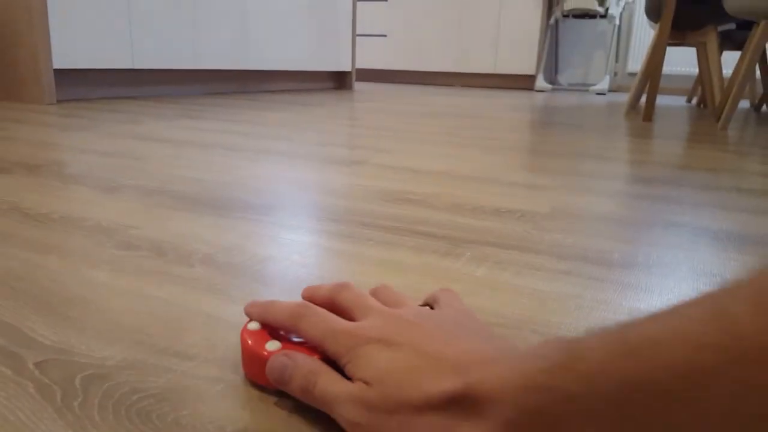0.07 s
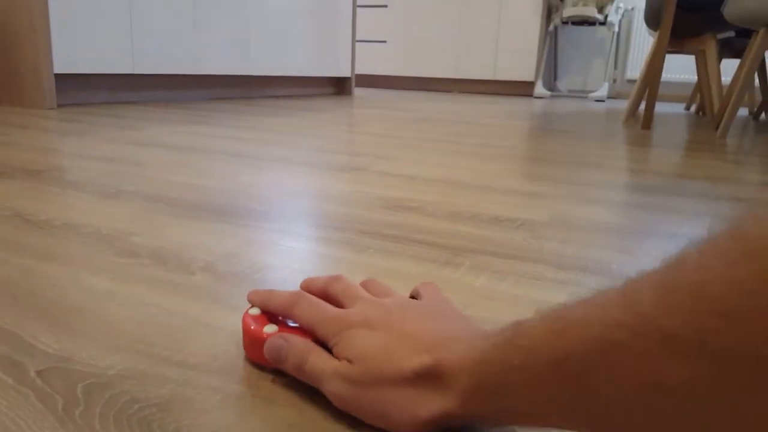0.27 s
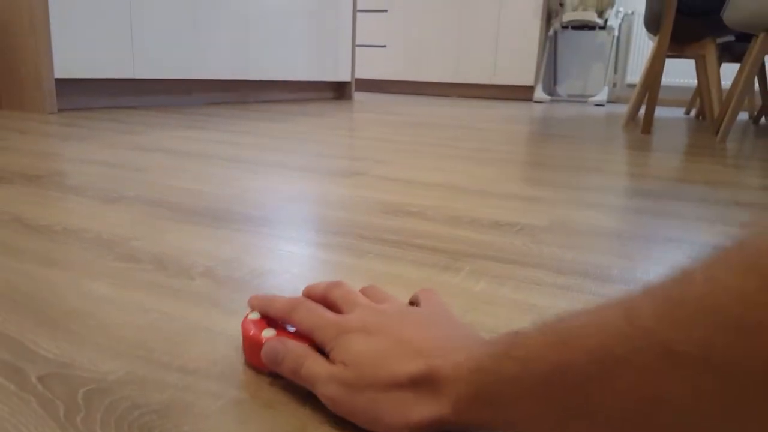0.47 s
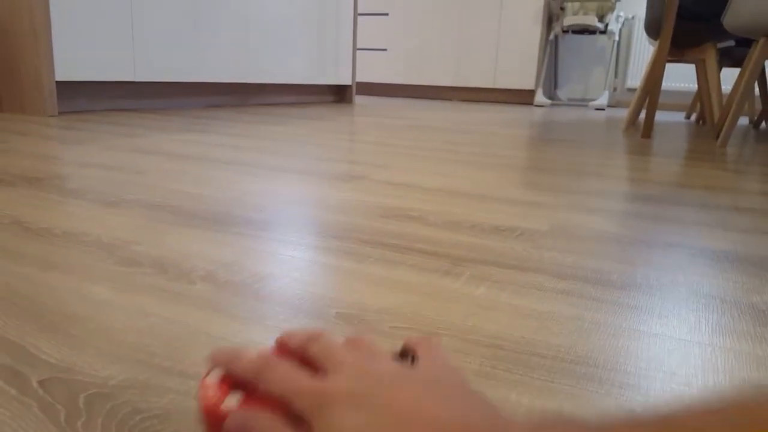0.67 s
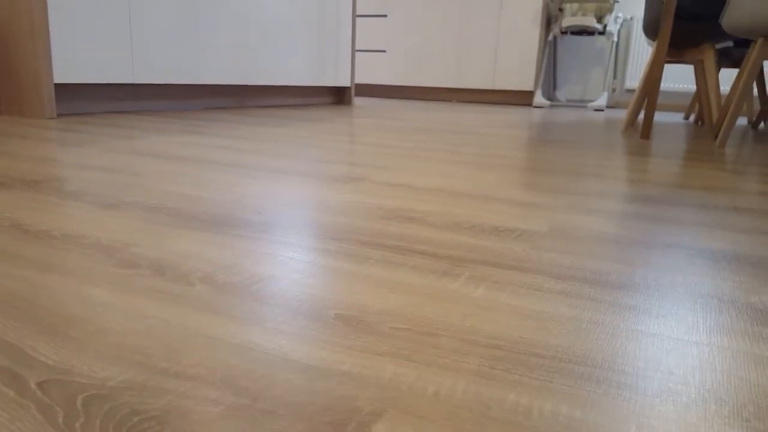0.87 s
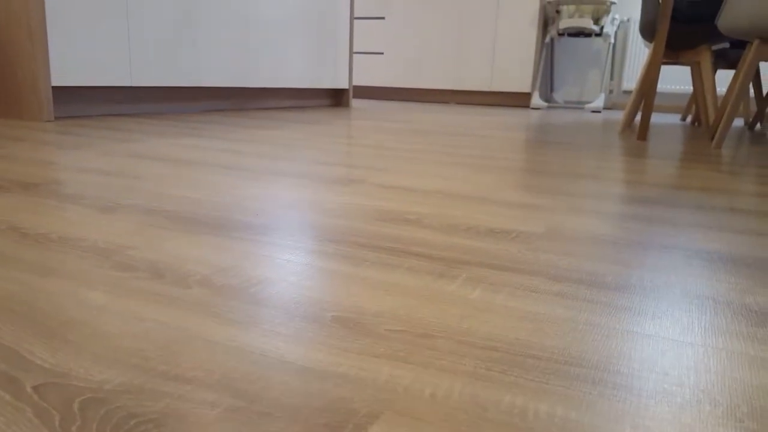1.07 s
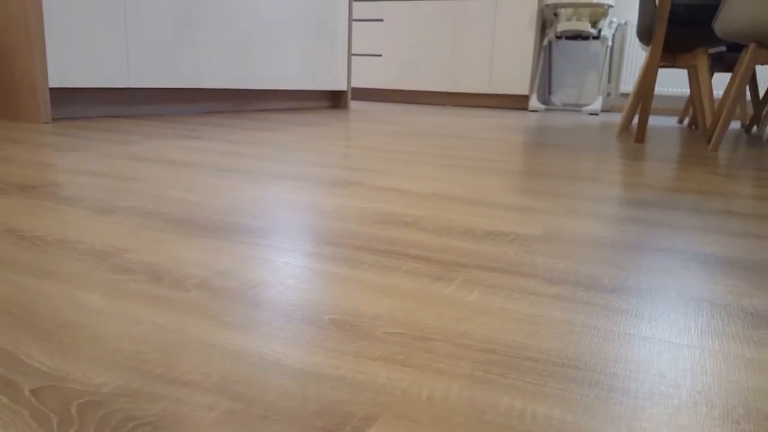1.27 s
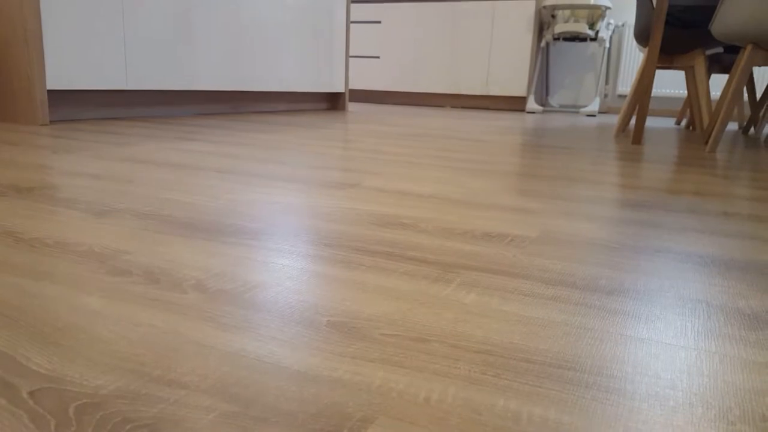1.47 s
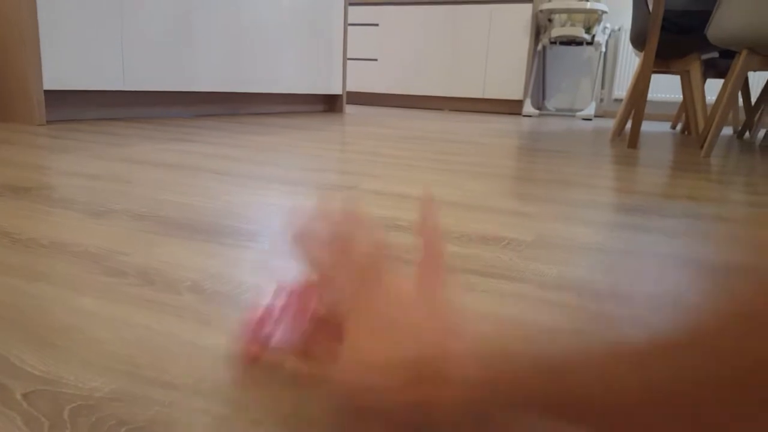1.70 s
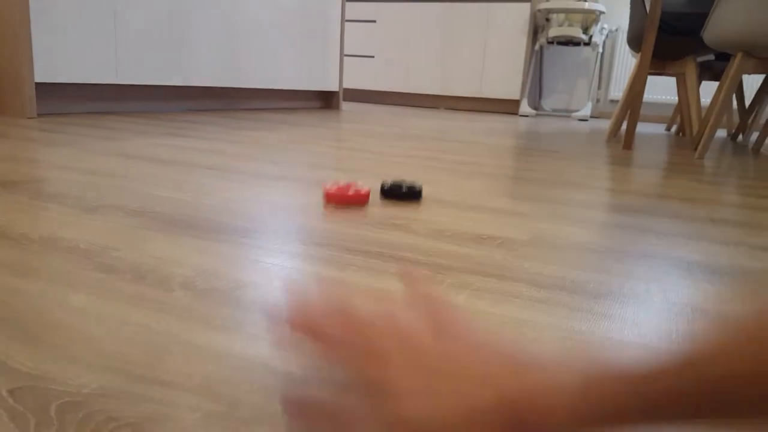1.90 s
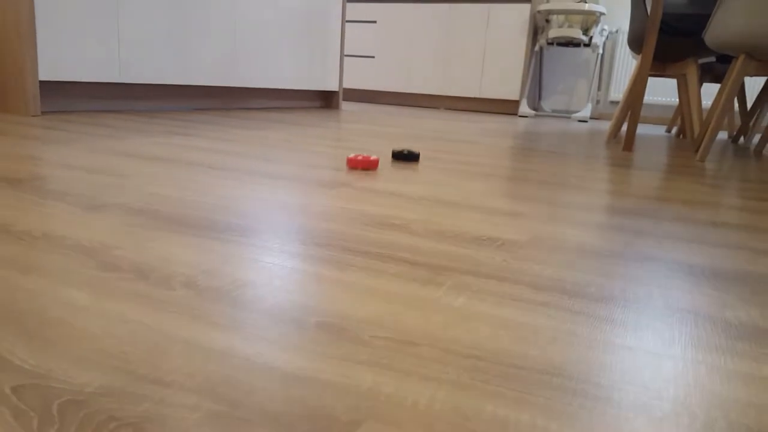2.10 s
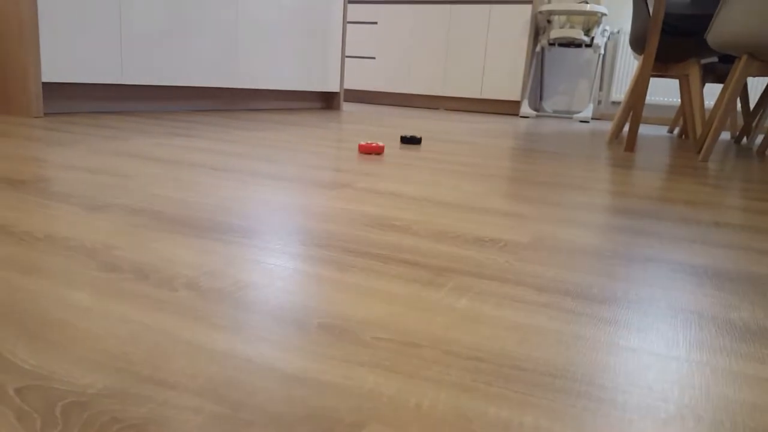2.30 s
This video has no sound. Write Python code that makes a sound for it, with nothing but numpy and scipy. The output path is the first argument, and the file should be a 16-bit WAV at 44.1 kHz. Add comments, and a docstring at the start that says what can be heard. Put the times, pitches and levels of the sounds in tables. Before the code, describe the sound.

Plastic pucks rasp as a hand drags and shoves them, then slide off hissing.

```python
"""Two plastic pucks on a laminate floor, heard from close by in a kitchen.
First a hand shifts them about. From 0.5 s it drags them back, and just after 1.5 s it shoves them off.
All this time they are pressed down, so they rasp, catch and drum on the humming boards.
Near 1.8 s the hand lets go: they wobble, chatter and glide away with a thin, ringing hiss.
As they go, a few soft thuds come through the floor."""
import sys
import numpy as np
from scipy import signal
from scipy.fft import rfft, irfft, next_fast_len
from scipy.io import wavfile
from scipy.ndimage import uniform_filter1d

SR = 44100
rng = np.random.default_rng(int(sys.argv[2]) if len(sys.argv) > 2 else 0)


def log_audio(samples):
    """Write samples as a 16-bit WAV file to the path given in sys.argv[1]."""
    # one column per channel
    frames = np.atleast_2d(samples).T
    # limit to full scale, then quantise
    limited = np.clip(frames, -1, 1)
    pcm = np.round(limited * 32767).astype(np.int16)
    wavfile.write(sys.argv[1], SR, pcm)


N = 108045
T = np.arange(N) / SR


# The three moves of the hand. Each row: time in seconds, drumming level in dB, grit level in dB.
SHIFT_LEVELS = [(0, -51, -78), (.045, -50.5, -76), (.1, -45.5, -63.5), (.21, -45, -64), (.245, -49, -69),
                (.34, -46, -62), (.358, -47.5, -68), (.396, -45.5, -63), (.408, -50, -62.5),
                (.47, -62, -84)]
DRAG_LEVELS = [(.5, -64, -99), (.555, -52, -70), (0.569, -45.5, -62.5), (.63, -39.5, -54.5),
               (.71, -35, -53), (.82, -33.5, -54.5), (.92, -32.5, -49), (1.05, -33.5, -52),
               (1.14, -34, -53), (1.28, -34.5, -55), (1.39, -35, -50), (1.467, -37, -53.5),
               (1.5, -46.5, -58.5), (1.531, -58, -82)]
SHOVE_LEVELS = [(1.547, -46, -72), (1.555, -41.5, -53), (1.592, -33.5, -47), (1.635, -30, -51),
                (1.71, -31.5, -45.5), (1.75, -33, -50.5), (1.79, -41, -49), (1.83, -54, -66),
                (1.9, -72, -77)]
# Bumps come thick and even at speed, sparse and clumped when slow.
# Each row: time in seconds, bumps per second, clumping in dB.
FLOOR_GRAIN = [(0, 1600, 3), (.9, 2800, 0.5), (1.15, 1400, 2), (1.45, 1240, 3), (1.64, 5030, -0.5)]
# The pressed pucks' hollow low note, and a higher one that sings out and rises in the shove.
# Each row: time in seconds, pitch in Hz, strength next to the boards in dB.
LOW_NOTE = [(.5, 644, -21), (.66, 640, -5), (.78, 880, -4.5), (.86, 739, -0.5), (.94, 671, 2),
            (1.09, 690, -0.5), (1.2, 690, 0), (1.58, 682, -0.5), (1.66, 625, -8.5)]
HIGH_NOTE = [(0, 1400, -2.5), (.72, 1425, -2), (.93, 1406, -3.5), (1.14, 1380, -1), (1.44, 1270, -4),
             (1.57, 1070, -8), (1.61, 1126, -2), (1.645, 1409, 6), (1.78, 1437, 4.5)]
# A note of steady pitch, and the bass in the drumming. Each row: time in seconds, strength in dB.
STEADY_NOTE = [(0, -10), (.4, -3), (.62, -4), (.8, -9.5), (.97, -7), (1.1, -16), (1.3, -19), (1.41, -8),
               (1.5, -9), (1.6, -8), (1.65, -9), (1.72, -2), (1.8, -1)]
BASS_LEVELS = [(0, -6), (.45, -7), (.7, -14.5), (1.0, -14), (1.3, -11.5), (1.55, -6.5), (1.61, -10.5),
               (1.67, -23.5), (1.9, -20)]
# The tone of the boards, their bass and the grit. Each row: frequency in Hz, strength in dB.
BOARD_TONE = [(30, -78), (200, -32), (400, -13.5), (530, -3.5), (660, -2.5), (900, 1.5), (1100, -2),
              (1480, -5), (1800, -5), (2100, -8), (2350, -18), (3000, -35), (6000, -68.5)]
BASS_TONE = [(25, -40), (60, -40.5), (100, -21), (145, -14.5), (200, -18), (300, 0.5), (420, 7), (600, -9),
             (1200, -45)]
GRIT_TONE = [(300, -18), (1500, 3.5), (2600, 5), (3050, -2.5), (3700, -3.5), (4700, 2), (5600, 0),
             (6600, -5), (7700, -3), (9500, -7.5), (11700, -10.5), (13000, -35), (14500, -59)]
def rasp():
    """Pressed pucks bump over the floor's grain: the boards drum, three notes swell, grit crackles."""
    drum_db, grit_db = follow(SHIFT_LEVELS + DRAG_LEVELS + SHOVE_LEVELS)
    bass_db, = follow(BASS_LEVELS)
    rate, clump_db = follow(FLOOR_GRAIN)
    low_hz, low_db = follow(LOW_NOTE)
    high_hz, high_db = follow(HIGH_NOTE)
    steady_db, = follow(STEADY_NOTE)
    grain = bumps(per_s=rate, spread_db=2, clump_db=clump_db, clump_hz=170, scatter=0.14)
    drum, power = unit(colour(grain, BOARD_TONE)), 1
    for hz, db, width_hz in [(low_hz, low_db, 311), (high_hz, high_db, 330), (2040, steady_db, 250)]:
        push = colour(grain * rng.choice([-1., 1.], N), BOARD_TONE)
        drum += amp(db) * resonate_twice(push, hz, width_hz)
        power += amp(db) ** 2
    drum = drum / np.sqrt(power) + amp(bass_db) * colour(grain, BASS_TONE)
    grit = colour(unit(specks() + 0.51 * grain), GRIT_TONE)
    return amp(drum_db) * drum + amp(grit_db) * grit


# Two sizes of grit. Each row: lowest and highest frequency of its crackle in Hz.
SPECK_BANDS = [(200, 4800), (4800, 15000)]
def specks():
    """Coarse and fine specks are crushed, each in their own bursts."""
    crackle = 0
    for band in SPECK_BANDS:
        bursts = bumps(per_s=4000, spread_db=4, clump_db=4, clump_hz=103, scatter=0.89)
        crackle += signal.sosfilt(signal.butter(2, band, "band", fs=SR, output="sos"), bursts)
    return crackle


HIT_GAIN = np.sqrt(0.0032 * SR)  # gives a hit the energy of 3.2 ms of sound at its level
# The tone of plastic ticking on the floor. Each row: frequency in Hz, strength in dB.
TICK_TONE = [(600, -25), (2800, -8.5), (4000, -2), (4800, 2.5), (6300, -2.5), (7800, -2), (10000, -13.5),
             (12000, -32), (14000, -47)]
# Pucks catching on the floor. Each row: start in seconds, knock level in dB, tick level in dB.
EDGE_CATCHES = [(0.022, -60, -49.5), (0.047, -47.5, -49), (0.0504, -38.5, -68), (0.0612, -48, -52),
                (.093, -42.5, -61.5), (0.0998, -40, -55), (.127, -41.5, -50), (.147, -39.5, -62.5),
                (0.15, -43, -50), (0.1846, -43.5, -51), (0.192, -39, -50), (.207, -39, -52),
                (0.219, -58.5, -45.5), (.295, -50, -50), (0.312, -37.5, -47), (.367, -40, -50.5),
                (0.376, -46, -50), (.393, -47, -49), (0.445, -54.5, -51.5), (.519, -64, -67),
                (0.563, -41, -54), (0.61, -45, -48), (0.937, -44, -42), (1.143, -29, -45.5),
                (1.195, -36, -51), (1.447, -34.5, -48), (1.552, -37, -49.5), (1.572, -40, -51),
                (1.743, -41, -58)]
def catches(decay_s=0.00171, judder_share=0.14):
    """A puck's edge catches: a knock in the boards, a brief judder and a scratchy tick."""
    knock, tick = np.zeros((2, N))
    for start, knock_db, tick_db in EDGE_CATCHES:
        add(knock, start, amp(knock_db) * np.sqrt(judder_share) * scuff(decay_s))
        add(knock, start, amp([knock_db]) * np.sqrt(1 - judder_share))
        add(tick, start, amp(tick_db) * scuff(decay_s))
    boards = colour(knock, BOARD_TONE) + 0.32 * colour(knock, BASS_TONE)
    return HIT_GAIN * (boards + colour(tick, TICK_TONE))


# The free slide. Each row: time in seconds, hiss level in dB, ring level in dB, ring pitch in Hz.
FREE_GLIDE = [(1.75, -69.5, -93, 4800), (1.8, -46, -64, 4770), (1.85, -48.5, -53, 4840),
              (1.92, -49, -51, 4720), (2.0, -47.5, -54.5, 4800), (2.15, -49.5, -56.5, 4650),
              (2.3, -50.5, -52.5, 4160), (2.45, -48.5, -55, 4100)]
# The tone of the hiss. Each row: frequency in Hz, strength in dB.
HISS_TONE = [(30, -39), (70, -47), (140, -21), (260, -14), (430, -2.5), (680, 2), (1000, -1.5),
             (1500, -9.5), (1800, -2.5), (2020, 2), (2300, -11.5), (3000, -12.5), (3800, -2.5), (5600, -11),
             (7500, -12.5), (11800, -25), (13000, -41), (14500, -59)]
def glide():
    """Free pucks hiss over the floor; as they slow, the pitch sinks onto the shells' own notes."""
    hiss_db, ring_db, ring_hz = follow(FREE_GLIDE)
    fine = bumps(per_s=6000, spread_db=2, clump_db=0.5, clump_hz=120, scatter=0.418)
    rough = bumps(per_s=4300, spread_db=5.5, clump_db=4.5, clump_hz=110, scatter=0.74)
    skim = resonate_twice(rough, ring_hz, width_hz=926)
    return amp(hiss_db) * colour(fine, HISS_TONE) + amp(ring_db) * (skim + shell_ring(skim))


# The shells' own notes, the main one last. Each row: pitch in Hz, width in Hz, strength in dB.
SHELL_NOTES = [(3780, 170, -0.5), (4750, 170, -8.5), (4277, 110, -0.5)]
def shell_ring(push):
    """A shaken plastic shell rings at its own notes."""
    return sum(amp(db) * resonate(push, hz, width_hz) for hz, width_hz, db in SHELL_NOTES)


# How loudly the shells chatter. Each row: time in seconds, level in dB.
CHATTER_LEVELS = [(0, -61), (.08, -53.5), (.2, -54.5), (.26, -57.5), (.39, -60), (.47, -99), (.53, -63),
                  (.62, -48), (.71, -45.5), (.8, -52.5), (.9, -52.5), (1.74, -70), (1.795, -46.5),
                  (1.85, -47.5), (1.92, -51), (2.0, -54), (2.2, -62), (2.45, -61)]
# The tone of the chatter. Each row: frequency in Hz, strength in dB.
CHATTER_TONE = [(100, -24), (500, -21), (1200, 8.5), (1750, 4), (2050, 5), (2350, 3.5), (3000, 1.5),
                (3900, 4.5), (4350, 2.5), (5000, -2), (6300, -7.5), (7800, -2.5), (10000, -14),
                (12000, -43), (14000, -61)]
def chatter(ring_db=-8.5):
    """The plastic shells chatter and ring thinly when little weight is on them."""
    level_db, = follow(CHATTER_LEVELS)
    taps = bumps(per_s=5000, spread_db=5.5, clump_db=6, clump_hz=131, scatter=0.69)
    return amp(level_db) * (colour(taps, CHATTER_TONE) + amp(ring_db) * unit(shell_ring(taps)))


# Released pucks touching down. Each row: start in seconds, tick level in dB, ping level in dB.
TOUCHDOWNS = [(1.794, -44, -55), (1.82, -48.5, -59.5), (1.832, -45, -55.5), (1.848, -41.5, -54),
              (1.864, -46, -59), (1.876, -45, -56), (1.904, -47, -42), (1.917, -47, -39.5),
              (1.956, -51.5, -45.5)]
def wobbles():
    """Each touch of a wobbling puck is a light tick and a ping of the shell's main note."""
    tick, strikes = np.zeros((2, N))
    hz, width_hz, _ = SHELL_NOTES[-1]
    for start, tick_db, ping_db in TOUCHDOWNS:
        add(tick, start, amp(tick_db) * scuff(decay_s=0.003))
        add(strikes, start, amp([ping_db]))
    ping = resonate(strikes, hz, width_hz) * np.sqrt(SR / (np.pi * width_hz))
    return HIT_GAIN * (colour(tick, TICK_TONE) + ping)


# Thuds in the floor. Each row: start in seconds, level in dB, pitch in Hz, length in seconds.
FLOOR_THUDS = [(1.9, -48.5, 197, 0.019), (2.103, -53.5, 89, 0.0278), (2.5, -62, 130, 0.044),
               (2.15, -58, 174.7, 0.034), (2.15, -70, 74, 0.05)]
def thuds():
    """Each thud is a few soft, low swings of the floor."""
    mix = np.zeros(N)
    for start, db, hz, length in FLOOR_THUDS:
        swell = np.sin(np.pi * np.clip((T - start) / length, 0, 1))
        mix += amp(db) * swell * np.sin(2 * np.pi * hz * (T - start))
    return mix


# How loudly the boards hum. Each row: time in seconds, level in dB.
HUM_LEVELS = [(0, -68), (.2, -73.5), (.31, -61.5), (.5, -77), (.62, -58.5), (.78, -68), (.88, -60),
              (1.05, -68), (1.35, -73), (1.8, -70.5), (2.45, -86.5)]
def hum():
    """The loose-laid floor hums at its own low note under the sliding pucks."""
    level_db, = follow(HUM_LEVELS)
    push = bumps(per_s=2900, spread_db=-1, clump_db=2.5, clump_hz=60, scatter=0.13)
    return amp(level_db) * resonate_twice(push, hz=146, width_hz=55)


# How long the room rings. Each row: frequency in Hz, seconds to fade by 60 dB.
ECHO_FADE = [(150, 0.01), (1000, 0.8), (4000, 0.44), (12000, 0.06)]
# Echo next to direct sound. Each row: frequency in Hz, level in dB before echo_db is added.
ECHO_LEVELS = [(150, -20.5), (700, -13), (1400, -13.5), (2100, -7.5), (3000, -5), (10000, -3)]
# How far the left microphone's wave runs ahead. Each row: frequency in Hz, lead in radians.
LEFT_LEAD = [(100, 0), (900, 0), (1400, 0.07), (1950, -1.2), (2900, -0.7), (4400, -1), (6800, -1.1),
             (10000, -2)]
# How much louder the left side is. Each row: frequency in Hz, left minus right in dB.
LEFT_BOOST = [(100, 0.5), (550, 0.5), (900, 1), (1400, 3.5), (2000, 1.5), (2900, -3), (4500, 2), (7000, 2),
              (12000, -2)]
def kitchen(x, echo_db, early_s, late_db):
    """Sound reaches two microphones directly, then as quick echoes and a short tail."""
    echoes = rng.standard_normal((2, SR // 2)) * (rng.random((2, SR // 2)) < .15)
    hz, t, spectrum = signal.stft(echoes, SR, nperseg=256)
    fade = np.exp(-t / early_s) + amp(late_db - 60 * t / read(ECHO_FADE, hz)[:, None])
    tail = signal.istft(spectrum * fade, SR, nperseg=256)[1]
    tail /= np.linalg.norm(tail, axis=1, keepdims=True)
    size = next_fast_len(N + SR)
    hz = np.fft.rfftfreq(size, 1 / SR)
    side = np.array([[.5], [-.5]])  # left, right
    direct = np.exp(1j * side * read(LEFT_LEAD, hz))
    echo_gain = amp(read(ECHO_LEVELS, hz) + echo_db)
    paths = (direct + echo_gain * rfft(tail, size)) / np.sqrt(1 + echo_gain ** 2 / 2)
    return irfft(rfft(x, size) * paths * amp(side * read(LEFT_BOOST, hz)), size)[:, :N]


def bumps(per_s, spread_db, clump_db, clump_hz, scatter):
    """Tiny hits of uneven size come in clumps; scatter makes each one differ left and right."""
    hits = rng.random(N) < per_s / SR
    size = np.minimum(rng.exponential(1, N), 4)
    sign = rng.choice([-1., 1.], N)
    treble_cut = 1 + (np.fft.rfftfreq(N, 1 / SR) / clump_hz) ** 4
    clumps = unit(irfft(rfft(rng.standard_normal(N)) / treble_cut, N))
    x = hits * sign * amp(spread_db * size + clump_db * np.minimum(clumps, 1.6))
    x /= np.sqrt(abs(uniform_filter1d(x ** 2, size=1100)) + 1e-9)  # holds the average level steady
    return x * (1 + np.array([[1], [-1]]) * scatter * rng.standard_normal(N))


def scuff(decay_s):
    """A burst of tiny slips that dies away, with a total energy of 1."""
    t = T[:SR // 50]
    burst = rng.standard_normal(len(t)) * np.exp(-t / decay_s)
    return burst / np.linalg.norm(burst)


def colour(x, tone):
    """Plays x through an object that rings with the given tone."""
    size = 4096
    log_gain = np.log(amp(read(tone, abs(np.fft.fftfreq(size, 1 / SR)))))
    response = np.exp(np.conj(signal.hilbert(log_gain)))  # rings only after a hit, never before
    ring = np.fft.ifft(response).real[:size // 2]
    return signal.fftconvolve(np.atleast_2d(x), ring[None] / np.linalg.norm(ring), axes=1)[:, :N]


def resonate(x, hz, width_hz):
    """Makes x ring at a steady or moving pitch; a smaller width rings longer."""
    turn = np.exp(2j * np.pi * np.cumsum(hz * np.ones(N)) / SR)
    decay = np.exp(-np.pi * width_hz / SR)
    return 2 * (turn * signal.lfilter([1 - decay], [1, -decay], x / turn + 1e-18)).real


def resonate_twice(x, hz, width_hz):
    """Rings x twice for a clearer pitch, at an average power of 1."""
    return unit(resonate(resonate(x, hz, width_hz), hz, width_hz))


def follow(rows):
    """Turns each column after the time into a curve with one value per sample."""
    times, *columns = np.transpose(rows)
    return [np.interp(T, times, column) for column in columns]


def read(rows, hz):
    """Reads between a table's rows at hz, giving every octave equal room."""
    row_hz, values = np.transpose(rows)
    return np.interp(np.log(hz + 1), np.log(row_hz + 1), values)


def add(mix, start_s, sound):
    """Mixes a sound in at its start time."""
    part = mix[round(start_s * SR):][:len(sound)]
    part += sound[:len(part)]


def amp(db):
    """Turns decibels into a multiplier."""
    return 10 ** (np.asarray(db) / 20)


def unit(x):
    """Scales x to an average power of 1."""
    return x / np.sqrt(np.mean(x ** 2) + 1e-20)


def scene():
    """Near pucks are heard mostly directly; their glide, chatter and wobble carry more echo."""
    near = kitchen(rasp() + catches() + hum() + thuds(), echo_db=1, early_s=0.0081, late_db=-13)
    far = kitchen(glide() + chatter() + wobbles(), echo_db=3, early_s=0.0037, late_db=-22)
    return near + far


def record(dry, cutoff_hz=14600):
    """Cuts away the very highest treble."""
    lowpass = signal.firwin(511, cutoff_hz, window=("kaiser", 9), fs=SR)
    return signal.oaconvolve(dry, lowpass[None], "same")


dry = scene()
out = record(dry)
log_audio(out)
```